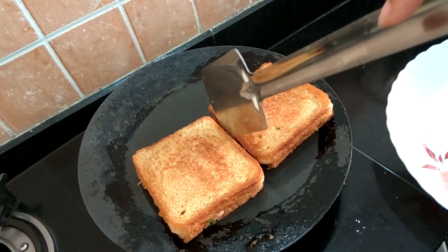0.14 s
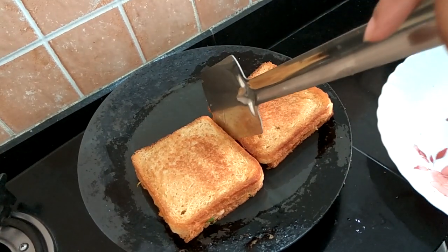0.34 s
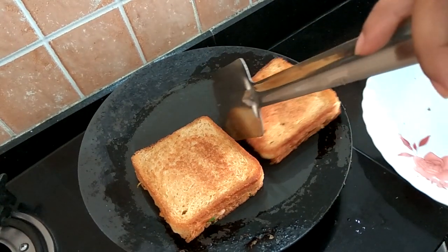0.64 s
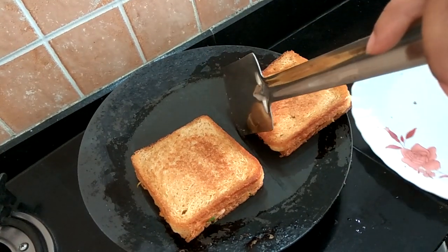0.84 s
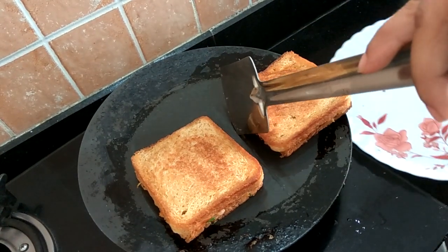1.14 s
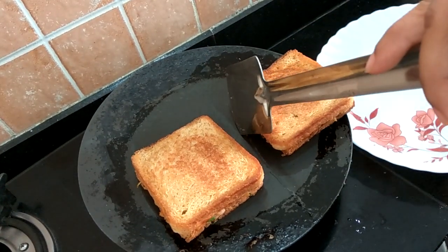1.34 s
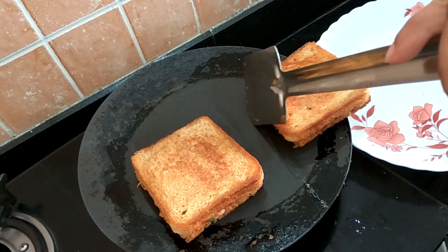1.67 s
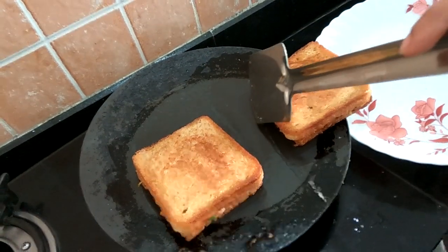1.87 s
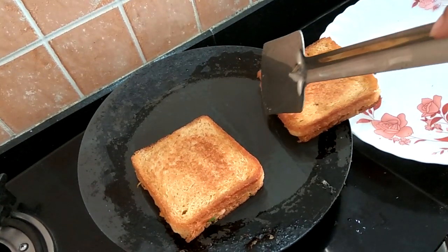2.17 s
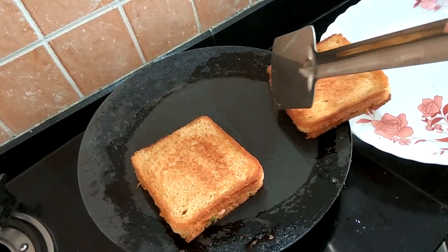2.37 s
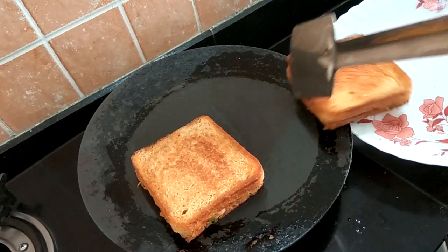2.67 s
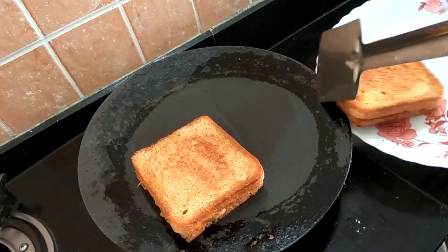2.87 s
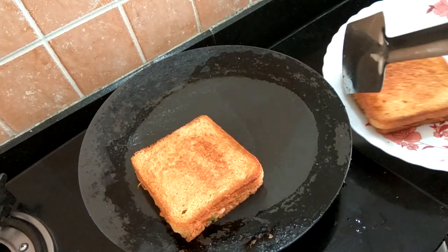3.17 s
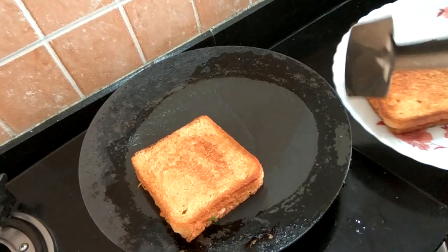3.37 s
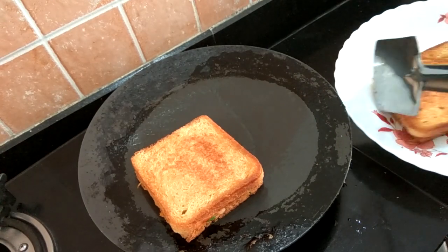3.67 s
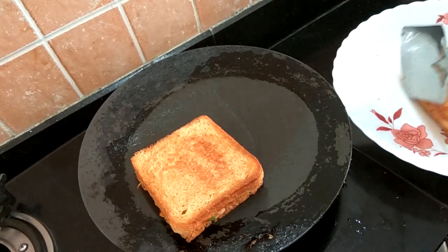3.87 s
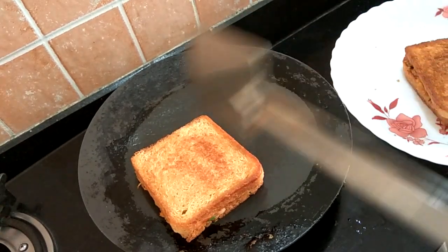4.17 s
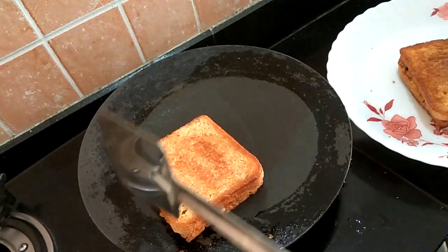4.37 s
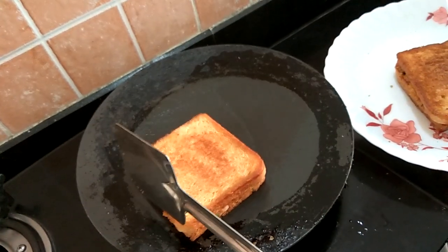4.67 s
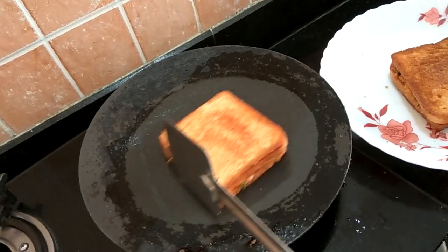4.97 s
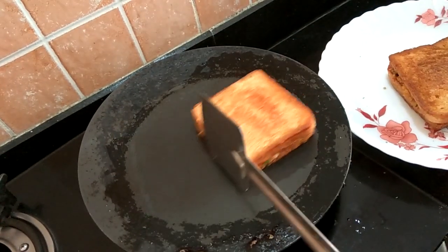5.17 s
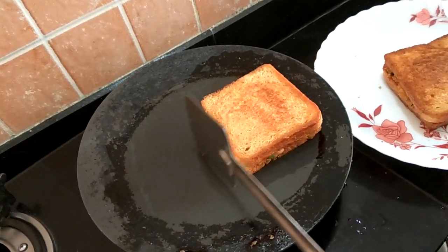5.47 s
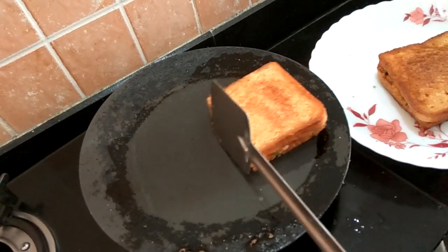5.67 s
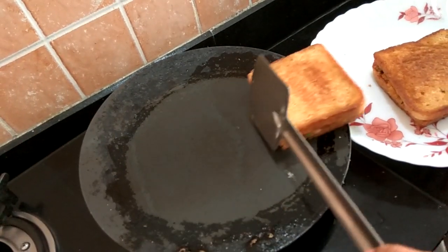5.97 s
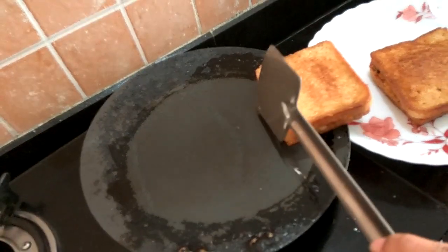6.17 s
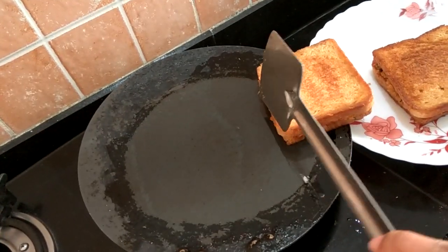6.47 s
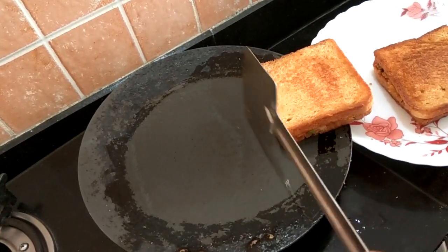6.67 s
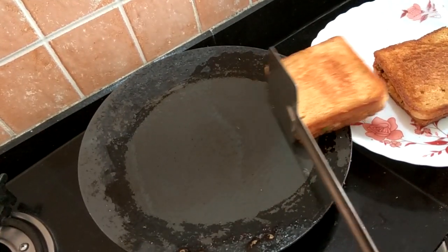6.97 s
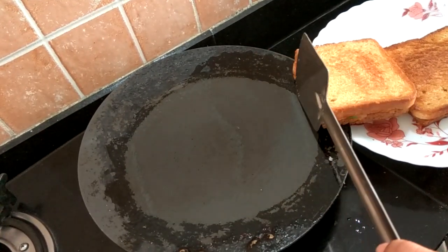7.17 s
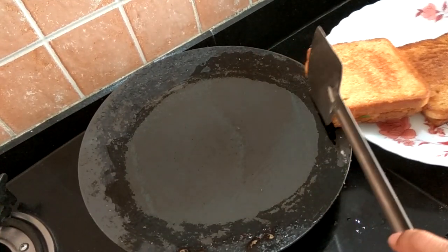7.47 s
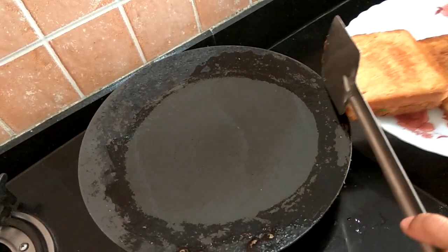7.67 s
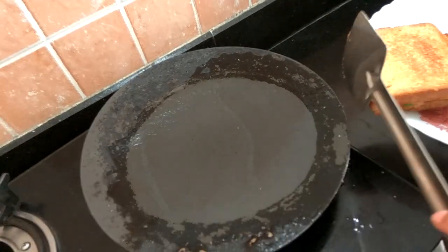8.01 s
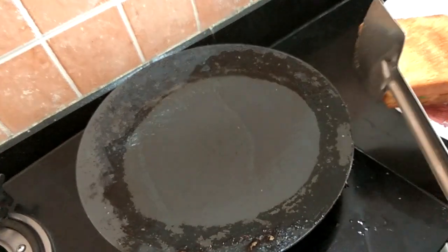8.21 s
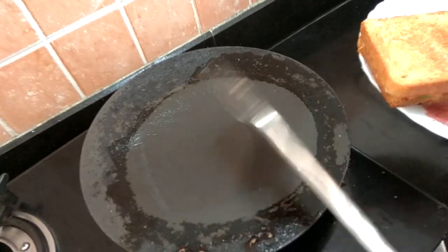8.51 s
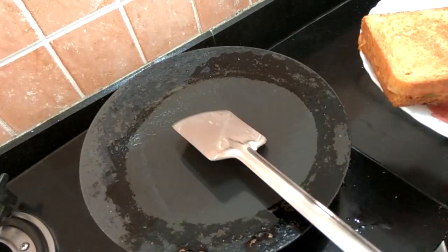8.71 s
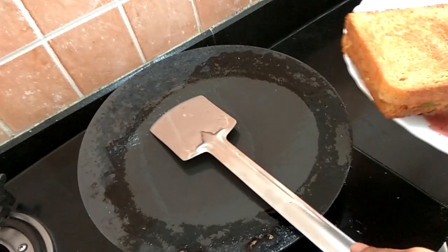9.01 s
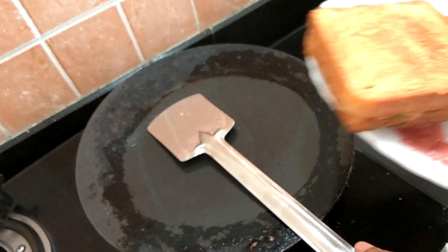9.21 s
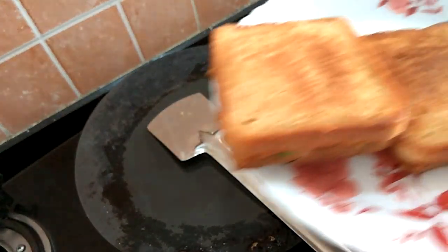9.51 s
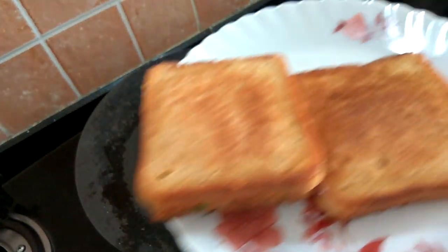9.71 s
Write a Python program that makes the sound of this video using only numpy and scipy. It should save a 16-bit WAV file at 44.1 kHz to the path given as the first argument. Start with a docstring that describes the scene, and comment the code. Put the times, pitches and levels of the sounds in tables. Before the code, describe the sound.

A steel spatula ticks and scrapes lightly on an iron griddle, then knocks against it with short metallic rings. The edge chatters and squeals, and the blade clinks sharply on a plate. Heavier clanks on the iron follow, with more brief squeals and a last clatter. Toast and dishes bump softly in between. The sound is close and leans left, in a small tiled kitchen with faint distant traffic.

```python
"""A steel spatula works on an iron griddle in a tiled kitchen.
Room tone, far traffic and a faint high whine run from the start. The blade ticks and scrapes;
from 1.1 s blows ring blade and griddle, and bread and dishes bump the counter. Near 3 s the edge chatters
and squeals, then clinks on a plate at 3.5 s. The heaviest blows on the iron fall from 5 to 7 s, more
squeals near 7.6 s, a last clatter near 9 s. The left side faces the stove; the right is shaded and dull."""
import sys
import numpy as np
from scipy import signal
from scipy.io import wavfile
from scipy.ndimage import uniform_filter1d

SR = 44100
rng = np.random.default_rng(int(sys.argv[2]) if len(sys.argv) > 2 else 0)


def master_out(mix):
    """Clip the mix to full scale and print it as 16-bit PCM to the path in sys.argv[1]."""
    frames = np.transpose(np.atleast_2d(mix))
    ceiling = np.clip(frames, -1, 1)
    pcm = np.round(ceiling * 32767).astype(np.int16)
    wavfile.write(sys.argv[1], SR, pcm)


N = 434385


def gain(db):
    """dB to amplitude."""
    return np.exp(np.asarray(db) * (np.log(10) / 20))


def unit_rms(x):
    """Scale to rms 1."""
    return x / np.sqrt(np.mean(x ** 2) + 1e-20)


def drift(window_samples, size=N):
    """Smoothed noise, rms 1."""
    return unit_rms(uniform_filter1d(rng.standard_normal(size), window_samples))


def at_hz(points, hz):
    """Spectrum table interpolated over log frequency."""
    table_hz, value = np.transpose(points)
    return np.interp(np.log(hz + 1), np.log(table_hz + 1), value)


def curves(rows):
    """Time table to one curve per column."""
    time_s, *columns = np.transpose(rows)
    return [np.interp(np.arange(N) / SR, time_s, column) for column in columns]


def swell(t, peak_s, rise_s, fall_s):
    """Asymmetric bell envelope, peak 1."""
    distance = np.where(t < peak_s, (peak_s - t) / rise_s, (t - peak_s) / fall_s)
    return np.exp(-distance ** 1.63)


def add(mix, start_s, sound):
    """Mix in a sound at start_s."""
    part = mix[round(start_s * SR):][:len(sound)]
    part += sound[:len(part)]


def equalise(x, points):
    """Minimum-phase filter from (frequency [Hz], gain [dB]) points."""
    hz = abs(np.fft.fftfreq(4096, 1 / SR))
    log_gain = np.log(gain(np.maximum(at_hz(points, hz), -100)))
    taps = np.fft.ifft(np.exp(log_gain - 1j * signal.hilbert(log_gain).imag)).real[:2048]
    return signal.oaconvolve(x, taps)[:len(x)]


def narrow_band(x, hz, width_hz):
    """Two equal resonators in series, rms 1."""
    b, a = signal.iirpeak(hz, hz / width_hz, SR)
    return unit_rms(signal.lfilter(b, a, signal.lfilter(b, a, x)))


def ring(modes, t60_scale, favoured_hz=(), lift_db=0, tilt_db_oct=0, contact_ms=0.87, scatter=0,
         size=6000):
    """Decaying modes, onset rms 1; those near favoured_hz are lifted, contact damps the first moments."""
    hz, db, t60_s = np.transpose(modes)[:, :, None]
    t = np.arange(size) / SR
    nearness = sum(np.exp(-(np.log(hz / f) / 0.028) ** 2) for f in favoured_hz)
    onset_db = db + lift_db * nearness + tilt_db_oct * np.log2(hz / 4000)
    level = gain(onset_db - 60 * t / (t60_s * t60_scale))
    phase = np.pi * (np.arange(len(hz))[:, None] + 2 * scatter * rng.random(hz.shape))
    damping = 1 + 1.3 * np.exp(-t * 1000 / contact_ms)
    attack = np.minimum(t * hz.min() / 0.56, 1)
    x = (level * np.sin(2 * np.pi * hz * t + phase)).sum(0) * damping * attack
    return x / np.sqrt(np.mean(x[:400] ** 2))


# Noise floor: (frequency [Hz], relative density [dB])
AIR_SPECTRUM = [(30, -46.5), (50, 2), (80, -4.5), (160, -10), (245, -22), (445, -17.5), (1000, -28.5),
                (2100, -34), (5700, -42.5), (8400, -46), (11000, -46), (14200, -55), (15000, -55),
                (16000, -81)]
# Floor coherence: (frequency [Hz], left-right correlation [0..1])
AIR_COHERENCE = [(60, 0.98), (180, 0.83), (550, 0.19), (1650, 0.04), (4970, 0.01), (15000, 0.24)]
# Floor balance: (frequency [Hz], left over right [dB])
AIR_BALANCE = [(60, -1), (180, 2), (550, 3), (1650, 3.5), (4970, -6), (15000, -7.5)]


def room_tone():
    """Stereo rumble and hiss with drifting spectral patches."""
    frames, hz = N // 256 + 5, np.fft.rfftfreq(1024, 1 / SR)
    left_re, left_im, side_re, side_im, patches = rng.standard_normal((frames, 513, 5)).T
    patch_db = 2.2 * unit_rms(uniform_filter1d(uniform_filter1d(patches, 10, 0), 12, 1))
    coherence = at_hz(AIR_COHERENCE, hz)[:, None]
    left = left_re + 1j * left_im
    right = coherence * left + np.sqrt(1 - coherence ** 2) * (side_re + 1j * side_im)
    shape_db = at_hz(AIR_SPECTRUM, hz) + np.array([[0.5], [-0.5]]) * at_hz(AIR_BALANCE, hz)
    spectra = np.array([left, right]) * gain(shape_db[:, :, None] + patch_db)
    return gain(-52.5) * unit_rms(signal.istft(spectra, nperseg=1024, noverlap=768)[1][:, :N])


# Engine swells: (time [s], deep level [dB], drone level [dB])
TRAFFIC_LEVELS = [(0.0, -54, -60), (3.18, -52, -52), (3.43, -50, -54.5), (3.73, -39, -49),
                  (3.84, -50.5, -58), (3.92, -40, -41.5), (3.98, -40, -57), (4.09, -45.5, -46.5),
                  (5.79, -50.5, -56.5), (6.8, -51.5, -47.5), (7.08, -49, -57), (7.21, -54.5, -45.5),
                  (9.03, -55, -65), (9.16, -49, -56), (9.41, -54.5, -52), (9.85, -54, -74)]
# Room resonances, three deep then three drone: (frequency [Hz], width [Hz], level [dB])
ROOM_MODES = [(52.05, 4.8, -2), (69.2, 20.3, 4), (87.4, 29, -6), (110, 8, 0.5), (157, 9.7, -0.5),
              (198.3, 8.3, -7.5)]


def traffic():
    """Far engines swell in the room's low resonances."""
    deep_db, drone_db = curves(TRAFFIC_LEVELS)
    noise, t = rng.standard_normal(N), np.arange(N) / SR
    flutter_db = unit_rms(sum(np.sin(2 * np.pi * (hz * t + rng.random()))
                              for hz in np.geomspace(1.5, 7, 8)))
    bands = [gain(db) * narrow_band(noise, hz, width_hz) for hz, width_hz, db in ROOM_MODES]
    deep = gain(deep_db + flutter_db - 0.5) * unit_rms(sum(bands[:3]))
    drone = gain(drone_db - 1) * unit_rms(sum(bands[3:]))
    return deep + drone


# Stationary tones: (frequency [Hz], level [dB], wobble [Hz])
WHINE_TONES = [(9680, -80.5, 18), (14580, -70.5, 8)]
# Wandering tone: (time [s], frequency [Hz])
WHINE_PITCH = [(0, 11850), (.42, 12000), (.55, 11900), (1.3, 11930), (1.4, 12020), (2.8, 12060),
               (5.5, 12020), (5.7, 12130), (7.8, 12050), (8.7, 11850), (9.85, 12030)]


def whine():
    """Faint, thin high tones that waver in pitch and flicker in level."""
    out = np.zeros((2, N))
    channel_db, channel_rad = np.array([[-2], [0.5]]), np.array([[0], [1.3]])
    for hz, db, wobble_hz in WHINE_TONES + [(curves(WHINE_PITCH)[0], -68.5, 50)]:
        cycles = np.cumsum(hz + wobble_hz * drift(900)) / SR
        flicker_db = 2 * drift(700)
        out += gain(db + flicker_db + channel_db) * np.sin(2 * np.pi * cycles + channel_rad)
    return out


# Contact noise: (frequency [Hz], relative density [dB])
CONTACT_SPECTRUM = [(600, -43.5), (1000, -14), (1350, -4), (1700, -10.5), (2300, -5), (4100, -9.5),
                    (5800, -9), (8200, -8), (11000, -22), (14400, -27), (16500, -50)]


def contact(tilt_db_oct, decay_ms):
    """Noise burst of an impact, onset rms 1."""
    t = np.arange(3000) / SR
    envelope = np.exp(-(t * 1000 / decay_ms) ** 0.83) * np.minimum(t / 0.0023, 1)
    spectrum = [(hz, db + tilt_db_oct * np.log2(max(hz, 2000) / 4000)) for hz, db in CONTACT_SPECTRUM]
    x = equalise(rng.standard_normal(len(t)) * envelope, spectrum)
    return x / np.sqrt(np.mean(x[:400] ** 2))


# Steel blade: (frequency [Hz], level [dB], base t60 [s])
BLADE_MODES = np.transpose([ [2110, 2265, 2500, 2595, 2700, 2810, 3200, 3420, 3490, 3730, 3950, 4385, 4530, 4625, 4740, 5090, 5630, 5820, 6015, 6420, 6830, 7190, 7480, 7980, 8110, 8690, 9050, 9400, 10850, 13500],
               [0, -2.5, -1, -3.5, -5.5, -4.5, -2, -1, -5, 2.4, -7.5, -1, -3.5, -1.5, -6.5, -6, -2, 3.5, -3.5, -0.5, -2.5, 0, -4.5, -2.5, 0, -8.5, -6, -6.5, -8, -14],
               [0.099, 0.04, 0.11, 0.11, .12, 0.12, 0.1, .12, 0.07, 0.075, 0.13, 0.09, 0.1, 0.14, .13, 0.05, .06, .05, 0.06, .06, .11, 0.1, 0.09, 0.09, 0.04, 0.06, .09, 0.12, 0.03, 0.03]])
# Grazing touches: (time [s], contact level [dB], favoured mode [Hz])
BLADE_TICKS = [(0.175, -57.5, 6000), (0.573, -60.5, 7150), (0.747, -63, 3370), (1.671, -57, 7640),
               (2.375, -56, 5500), (2.429, -56.5, 8040), (2.45, -49, 4450), (2.534, -45, 5820),
               (2.618, -50, 5580), (2.72, -46, 7200), (2.835, -42, 5840), (4.658, -48.5, 3260),
               (6.296, -50, 5950), (6.383, -54.5, 6910), (7.753, -48, 7900), (8.172, -48, 5530)]


def ticks(tilt_db_oct=5, contact_ms=4.3):
    """Light touches ring the blade, too weak to move the griddle."""
    out = np.zeros(N)
    for time_s, db, hz in BLADE_TICKS:
        add(out, time_s, gain(db) * contact(tilt_db_oct, contact_ms))
        blade = ring(BLADE_MODES, 1.9, [hz], lift_db=21.5, tilt_db_oct=tilt_db_oct,
                     contact_ms=contact_ms, scatter=0.96)
        add(out, time_s, gain(db - 6.5) * blade)
    return out


def flexing_blade(catches, t60_scale=0.4, spread_db=5, detune=0.012):
    """Tilt and flex shift the blade's modes: three postures fade in and out at random."""
    out = np.zeros(N)
    for _ in range(3):
        modes = BLADE_MODES + rng.standard_normal(BLADE_MODES.shape) * [0, spread_db, 0]
        modes[:, 0] *= 1 + detune * rng.standard_normal(len(modes))
        share = np.maximum(drift(4000) + 0.4, 0)
        response = ring(modes, t60_scale, tilt_db_oct=1.5, size=2000)
        out += unit_rms(signal.oaconvolve(catches * share, response)[:N])
    return unit_rms(out)


# Iron griddle: (frequency [Hz], level [dB], base t60 [s])
GRIDDLE_MODES = np.transpose([ [1290, 1340, 1410, 1490, 1560, 1630, 1715], [-3, -4, -1.5, 0, -3, -2, 0],
                 [0.2, 0.3, 0.22, .16, 0.06, 0.12, 0.12]])
# Counter under griddle and plate: (frequency [Hz], level [dB], base t60 [s])
COUNTER_MODES = [(280, 1, 0.089), (350, -3.5, 0.15), (420, -2.5, 0.12), (520, -5, .08), (645, -4.5, 0.1),
                 (740, -2.5, 0.12), (900, -1, 0.07), (1230, -5, .1)]
# Edge over iron: (peak time [s], rise [s], fall [s], blade [dB], griddle [dB], bread [dB])
SCRAPE_STROKES = [(.76, 0.092, 0.13, -61.5, -75, -69), (1.18, 0.033, 0.14, -77, -80, -60.5),
                  (1.6, 0.1, 0.18, -61, -70, -66), (2.12, 0.1, 0.3, -55, -70, -60.5),
                  (2.72, 0.21, 0.43, -54, -70, -64.5), (3.06, 0.039, 0.11, -41, -49.5, -46),
                  (3.65, 0.094, 0.052, -38.5, -49, -51), (3.92, 0.072, 0.06, -42, -68, -57.5),
                  (4.12, 0.065, 0.097, -56.5, -65.5, -59), (4.85, 0.16, .15, -58.5, -66, -64.5),
                  (5.16, 0.078, 0.21, -50, -57, -54.5), (5.57, .05, .09, -39, -50, -56),
                  (5.97, 0.14, 0.14, -49.5, -56, -61.5), (6.96, 0.097, 0.13, -38.5, -48.5, -60),
                  (7.17, 0.045, 0.063, -38.5, -55, -63), (7.6, 0.16, 0.11, -39.5, -52, -52),
                  (7.73, 0.043, 0.024, -55, -50, -61), (7.95, 0.097, 0.11, -63, -63, -65),
                  (8.3, 0.13, 0.073, -58, -69, -62), (8.88, 0.078, 0.12, -43, -55, -65),
                  (9.12, 0.034, 0.26, -53, -55, -56.5), (9.47, 0.06, 0.16, -64, -62, -56)]


def scrapes(catches_per_s=5000, spread_db=3, patch_db=2.5, resting_db=(-71, -81, -72)):
    """The dragged edge catches on tiny bumps, driving damped blade and griddle modes; bread rubs along."""
    t = np.arange(0, N / SR + 0.01, 0.002)
    levels = gain(resting_db)[:, None] + sum(gain(db)[:, None] * swell(t, peak_s, rise_s, fall_s)
                                             for peak_s, rise_s, fall_s, *db in SCRAPE_STROKES)
    blade_gain, griddle_gain, bread_gain = (np.interp(np.arange(N) / SR, t, level) for level in levels)
    strength = gain(spread_db * np.minimum(rng.exponential(1, N), 5))
    catches = strength * (rng.random(N) < catches_per_s / SR)
    catches *= gain(patch_db * drift(600))  # rough patches of iron
    catches = unit_rms(catches * rng.choice([-1., 1.], N))
    blade = 0.5 * flexing_blade(catches) + 0.42 * unit_rms(equalise(catches, CONTACT_SPECTRUM))
    griddle = unit_rms(signal.oaconvolve(catches, ring(GRIDDLE_MODES, t60_scale=0.12))[:N])
    bread = unit_rms(signal.oaconvolve(catches, ring(COUNTER_MODES, t60_scale=0.1))[:N])
    return blade_gain * blade + griddle_gain * griddle + bread_gain * bread


# Firm blows: (time [s], blade [dB], griddle [dB], thud [dB], contact [dB], tilt [dB/oct],
# t60 scale [ratio], favoured thud [Hz], five favoured metal modes [Hz])
SPATULA_BLOWS = [(1.103, -34.5, -38, -44, -36, -1.5, 0.6, 740, 1490, 1715, 2150, 2700, 4740),
                 (1.3188, -46, -44, -60, -42, -4, 1, 645, 1340, 1715, 2700, 3200, 4740),
                 (1.9147, -30, -40, -34, -29, -1.5, 0.8, 1230, 1715, 2590, 3420, 3730, 4530),
                 (2.17, -56, -62, -52, -50, 2, 0.79, 645, 1290, 3730, 4625, 5630, 7190),
                 (2.566, -46, -61, -68, -40, 5.5, 0.46, 645, 1290, 3730, 5630, 5820, 7480),
                 (2.7964, -43.5, -62, -57, -54, 1, 1, 645, 1490, 3420, 4530, 6830, 7190),
                 (2.848, -30.5, -35, -37, -32, 0.5, 0.9, 645, 1410, 2590, 6420, 6830, 8110),
                 (2.8728, -29, -33, -34.5, -20, 3, 0.7, 880, 1290, 1715, 2590, 5630, 8110),
                 (2.948, -24, -28, -29, -17.5, 2.5, 0.5, 645, 1490, 2590, 3730, 5630, 8110),
                 (3.138, -52, -43, -42, -37, 3, 0.45, 345, 1490, 3730, 4530, 5630, 8110),
                 (3.483, -18, -46, -35, -22, 4.5, 0.5, 920, 3730, 4530, 5630, 5630, 7190),
                 (3.8518, -40, -55, -47, -43, 0.5, 0.76, 645, 1290, 2105, 3420, 5090, 6015),
                 (4.0544, -34, -33, -34.5, -33, -2, 1, 365, 1490, 1715, 2810, 4740, 5820),
                 (4.984, -18.5, -16.5, -30, -18, -2.5, 0.8, 740, 1560, 2265, 3490, 3730, 5820),
                 (5.1826, -33.5, -37, -30.5, -29, 0, 0.4, 645, 1290, 1490, 2105, 2810, 6830),
                 (5.4893, -18, -23, -39, -22, -1.5, 0.4, 280, 1290, 1630, 2105, 3200, 5820),
                 (5.6537, -29, -35, -47, -34, -1.5, 0.5, 740, 1340, 2105, 3730, 3730, 5820),
                 (5.9977, -38.5, -41.5, -44, -38, 1.5, 0.45, 645, 1490, 2590, 3950, 5820, 7190),
                 (6.802, -19.5, -19, -36.5, -22, -0.5, 0.45, 500, 1410, 1715, 2500, 3420, 4385),
                 (7.232, -35, -43, -47, -40, 2, 0.4, 350, 1715, 2500, 5820, 5820, 7190),
                 (7.656, -34, -39, -45, -36, 0, 0.4, 645, 1410, 2105, 3730, 5820, 8110),
                 (7.851, -33, -45, -40, -32, 0.9, 0.3, 280, 1410, 2105, 4385, 6015, 7190),
                 (7.888, -44, -65, -49, -40.5, -1, 0.46, 280, 1410, 2105, 4625, 5820, 7190),
                 (8.7131, -25, -34, -47, -21.5, 6.5, 1.0, 420, 1715, 2150, 4625, 6830, 7980),
                 (8.925, -27, -35, -50, -36, 8, 0.6, 280, 1630, 4385, 5820, 6420, 7190),
                 (8.9399, -24, -33, -46, -21, 6, 0.37, 280, 1630, 2500, 3200, 6420, 7190),
                 (8.957, -28, -34, -60, -32, 5, 0.5, 280, 1630, 2500, 4385, 5820, 7190),
                 (9.199, -28, -38, -40, -28.5, 0.1, 0.7, 740, 1410, 2590, 3420, 4740, 5630),
                 (9.452, -33, -50, -46, -36, -2, 0.7, 280, 2105, 2105, 2265, 2810, 4740)]


def blows(contact_ms=6.2):
    """Impacts ring blade, griddle and counter; the struck spot favours a few modes."""
    out = np.zeros(N)
    for (time_s, blade_db, griddle_db, thud_db, contact_db, tilt_db_oct,
         t60_scale, thud_hz, *metal_hz) in SPATULA_BLOWS:
        add(out, time_s, gain(contact_db) * contact(tilt_db_oct, contact_ms))
        blade = ring(BLADE_MODES, t60_scale, metal_hz, lift_db=10.5, tilt_db_oct=tilt_db_oct,
                     contact_ms=contact_ms, scatter=0.99)
        griddle = ring(GRIDDLE_MODES, 0.66 * t60_scale, metal_hz, lift_db=9,
                       contact_ms=contact_ms, scatter=0.96)
        thud = ring(COUNTER_MODES, 0.5, [thud_hz], lift_db=7, contact_ms=contact_ms, size=4000)
        add(out, time_s, gain(blade_db) * blade + gain(griddle_db) * griddle)
        add(out, time_s, gain(thud_db) * thud)
    return out


# Bread and dishes landing: (time [s], level [dB], favoured mode [Hz])
SOFT_BUMPS = [(1.231, -44, 285), (2.151, -47, 656), (4.711, -44, 266), (7.31, -42, 269),
              (8.564, -46.5, 277), (9.411, -45.5, 270)]


def bumps(lead_s=300 / SR):
    """Slow, soft landings shake the counter briefly."""
    out = np.zeros(N)
    for time_s, db, hz in SOFT_BUMPS:
        force = rng.standard_normal(1500) * np.hanning(1500)
        counter = ring(COUNTER_MODES, 0.37, [hz], lift_db=14.5)
        add(out, time_s - lead_s, gain(db) * signal.oaconvolve(force / np.linalg.norm(force), counter))
    return out


# Blade chatter: (peak time [s], rise [s], fall [s], blade [dB], griddle [dB],
# favoured blade mode [Hz], favoured griddle mode [Hz])
BLADE_RATTLES = [(2.846, 0.016, 0.0066, -41, -39, 6830, 1410),
                 (3.125, 0.011, 0.0099, -38, -36.5, 4530, 1490), (3.503, .006, .006, -31, -50, 5630, 1290),
                 (7.135, .008, 0.025, -43, -45, 2265, 1715), (7.758, 0.013, 0.01, -40.5, -52, 4625, 1410),
                 (8.722, 0.006, 0.012, -19, -28, 5820, 1715), (8.925, 0.011, 0.011, -30, -34, 5820, 1630),
                 (8.964, 0.022, 0.014, -24, -31, 6420, 1630)]


def rattles(knocks_per_s=1500):
    """Quick uneven rebounds, each ringing blade and griddle briefly."""
    out, t = np.zeros(N), np.arange(-0.1, 0.15, 1 / SR)
    for peak_s, rise_s, fall_s, blade_db, griddle_db, blade_hz, griddle_hz in BLADE_RATTLES:
        knocks = rng.standard_normal(len(t)) * (rng.random(len(t)) < knocks_per_s / SR)
        knocks = unit_rms(knocks) * swell(t, 0, rise_s, fall_s)
        blade = ring(BLADE_MODES, 0.3, [blade_hz], lift_db=10, size=2000)
        griddle = ring(GRIDDLE_MODES, 0.25, [griddle_hz], lift_db=10, size=2000)
        for db, body in (blade_db, blade), (griddle_db, griddle):
            add(out, peak_s + t[0], gain(db) * signal.oaconvolve(knocks, body / np.linalg.norm(body)))
    return out


# Stick-slip of the edge: (peak time [s], rise [s], fall [s], level [dB], frequency [Hz])
EDGE_SQUEALS = [(3.05, 0.07, 0.07, -42, 1423), (3.14, .025, .015, -38, 1470),
                (5.549, 0.026, 0.1, -50, 1365), (7.47, .03, 0.027, -48.5, 1423),
                (7.545, 0.043, 0.035, -43.5, 1389), (7.615, 0.018, .025, -42.5, 1497),
                (7.66, .02, .03, -45, 1414), (7.745, 0.038, 0.052, -35, 1395),
                (7.862, .008, 0.029, -39, 1402)]


def squeals(waver_hz=8, rasp_gain=0.3):
    """Slips lock to one griddle mode: a wavering tone with a little rasp."""
    out, t = np.zeros(N), np.arange(-0.2, 0.3, 1 / SR)
    for peak_s, rise_s, fall_s, db, hz in EDGE_SQUEALS:
        tone = np.sin(2 * np.pi * np.cumsum(hz + waver_hz * drift(900, len(t))) / SR)
        rasp = narrow_band(rng.standard_normal(len(t)), hz, width_hz=88)
        squeal = unit_rms(unit_rms(tone) + rasp_gain * rasp)
        add(out, peak_s + t[0], gain(db) * squeal * swell(t, 0, rise_s, fall_s))
    return out


# Glazed plate: (frequency [Hz], level [dB], base t60 [s])
PLATE_MODES = np.transpose([ [700, 1240, 2050, 2190, 2800, 3600, 3745, 4520, 5630, 6020, 6900, 7850],
               [-6, -6, -6, 5, -5, -8, -1, 0, 1, -5, -2, -8],
               [0.25, 0.9, 0.3, .62, 0.24, .3, 0.37, 0.5, .45, 0.3, 0.47, 0.2]])
# Blade on plate: (time [s], level [dB])
PLATE_CLINKS = [(3.483, -26.5), (3.852, -54), (4.055, -56), (4.658, -62), (8.172, -65.5)]


def clinks():
    """The struck plate rings on, lightly damped."""
    out = np.zeros(N)
    for time_s, db in PLATE_CLINKS:
        add(out, time_s, gain(db) * ring(PLATE_MODES, t60_scale=0.97, scatter=1, size=20000))
    return out


# Tiled room decay: (frequency [Hz], t60 [s])
KITCHEN_T60 = [(250, 0.59), (660, 0.46), (1740, 0.49), (4590, 0.48), (12100, 0.24)]


def kitchen_reverb(x, movement_hz=1.3, common_bass_hz=800):
    """Sparse reflections decay band by band; three sets crossfade as the source moves."""
    out, angle = 0, 2 * np.pi * movement_hz * np.arange(N) / SR
    for k in range(3):
        taps = np.zeros((2, SR))
        arrivals = np.arange(100, SR - 20, 20) + rng.integers(0, 20, (2, (SR - 101) // 20))
        np.put_along_axis(taps, arrivals, rng.choice([-1., 1.], arrivals.shape), 1)
        hz, t, spectra = signal.stft(taps, SR, nperseg=256)
        coherence = 1 / (1 + (hz[:, None] / common_bass_hz) ** 2)
        spectra[1] = coherence * spectra[0] + np.sqrt(1 - coherence ** 2) * spectra[1]
        decay = gain(-60 * t / at_hz(KITCHEN_T60, hz)[:, None])
        tail = signal.istft(spectra * decay, SR, nperseg=256)[1][:, :SR // 2]
        share = np.sqrt(2 / 3) * np.cos(angle + np.pi * k / 3)
        out += signal.oaconvolve((x * share)[None], tail / np.linalg.norm(tail[0]), axes=1)[:, :N]
    return out


# Shading of the right side: (frequency [Hz], loss [dB])
RIGHT_LOSS = [(60, -3.5), (110, 2), (200, 0.5), (380, -.5), (700, 1.5), (1290, 6.5), (2380, 4.5),
              (4400, 14.5), (8120, 21.5), (15000, 5.5)]


def scene():
    """Direct sound and reverb, shaded on the right, over the background; pure tones carry less room."""
    clatter = blows() + ticks() + bumps() + scrapes() + rattles()
    tones = squeals() + clinks()
    direct = gain([[0.5], [-4]]) * (clatter + tones)
    reverb = gain([[-4], [-1]]) * kitchen_reverb(clatter + 0.35 * tones)
    cooking = direct + reverb
    cooking[1] = equalise(cooking[1], [(hz, -db) for hz, db in RIGHT_LOSS])
    return gain(2.5) * cooking + room_tone() + traffic() + whine()


def record(dry):
    """High-pass, soft clip, low-pass."""
    low_hz, high_hz, ceiling = 46, 16700, 0.85
    thinned = signal.sosfilt(signal.butter(4, low_hz, "high", fs=SR, output="sos"), dry)
    clipped = ceiling * np.tanh(thinned / ceiling)
    lowpass = signal.firwin(511, high_hz, window=("kaiser", 9), fs=SR)
    return signal.oaconvolve(clipped, lowpass[None], "same")


dry = scene()
out = record(dry)
master_out(out)
```